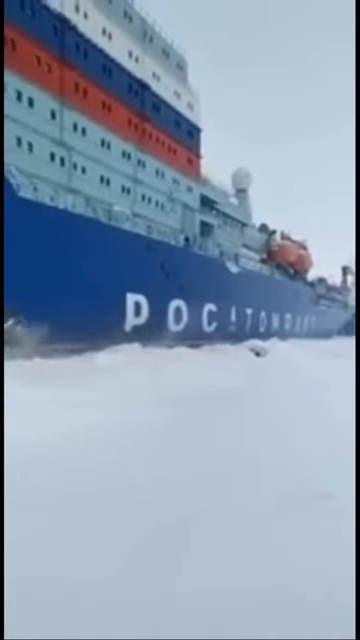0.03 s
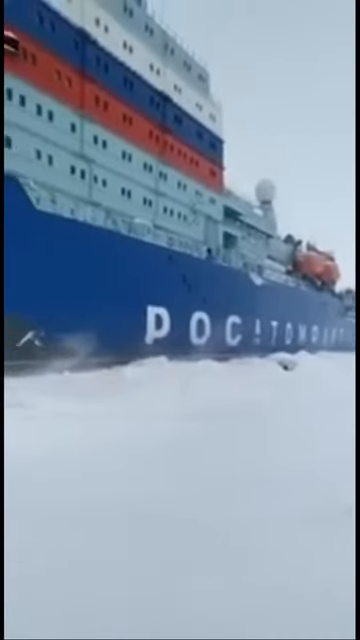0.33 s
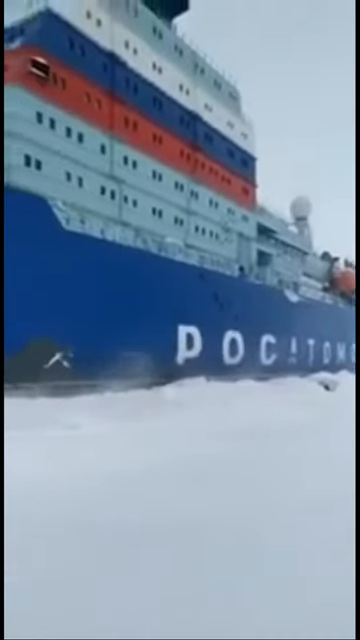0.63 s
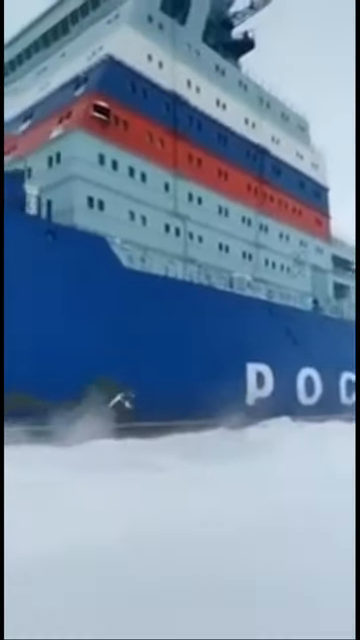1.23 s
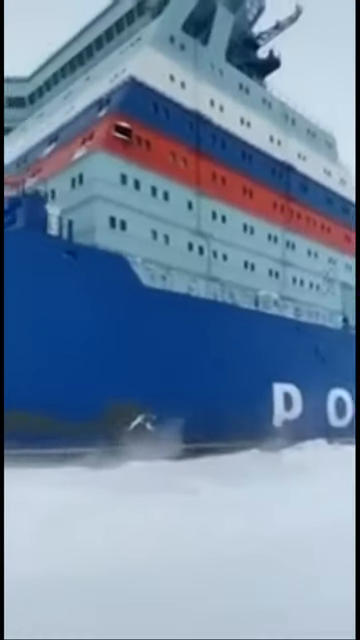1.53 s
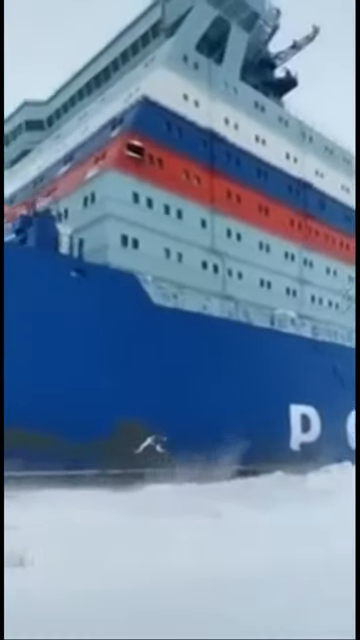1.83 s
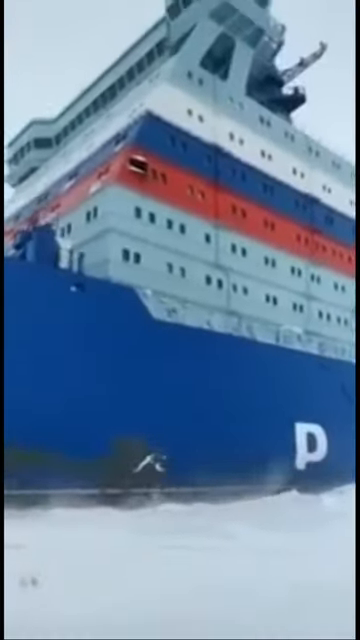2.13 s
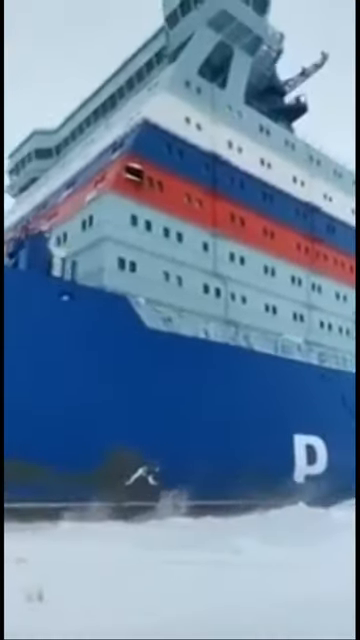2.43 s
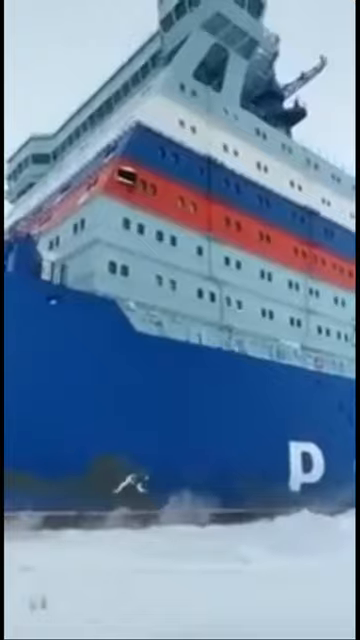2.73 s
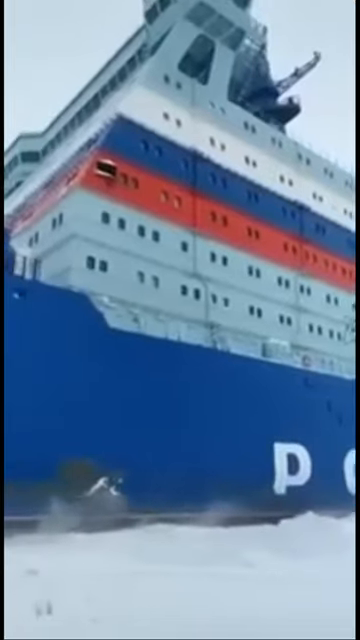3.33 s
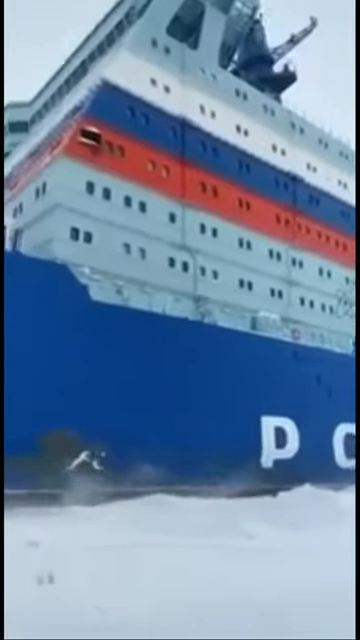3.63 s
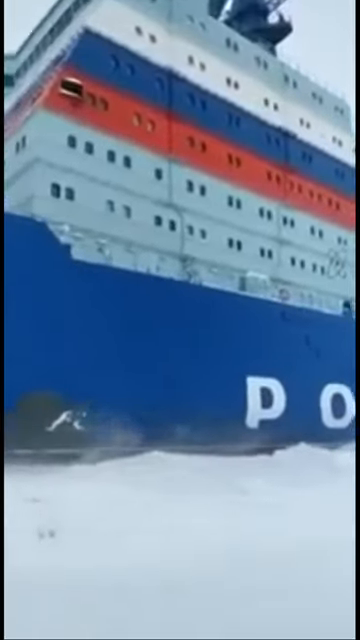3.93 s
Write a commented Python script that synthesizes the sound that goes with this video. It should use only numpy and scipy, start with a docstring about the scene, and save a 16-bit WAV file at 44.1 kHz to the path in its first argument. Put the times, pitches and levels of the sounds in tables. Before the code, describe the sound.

Strong wind buffets the microphone for the whole four seconds, a deep rumble under fluttering air, with short ragged gusts and tiny high ticks. Behind it, ice and snow hiss quietly along a ship's hull, and from about 0.4 seconds the ice gives occasional faint, sharp cracks. The flutter is strongest near 2.7 seconds, followed by a run of hard, rasping gusts until about 3.5 seconds.

```python
"""Strong wind buffets a phone microphone beside a large ship pushing through snow-covered sea ice.
From the start, a deep rumble lies under fluttering air; eddies (swirls of wind) tear across the
microphone's opening and it ticks. Behind the wind, ice and blown snow hiss along the hull, and from
0.4 s the ice cracks now and then. The flutter is strongest near 2.7 s; a run of hard eddies follows."""
import sys
import numpy as np
from scipy import signal
from scipy.fft import rfft, irfft
from scipy.io import wavfile
from scipy.ndimage import uniform_filter1d, map_coordinates

SR = 44100
rng = np.random.default_rng(int(sys.argv[2]) if len(sys.argv) > 2 else 0)


def transcribe(u):
    """Save the signal u as a 16-bit wav file named by the first command-line argument.

    u: samples, shape (n,) or (channels, n), limited to [-1, 1]; the rate is SR.
    q: integer samples, one column per channel.
    """
    v = np.clip(np.atleast_2d(u).T, -1, 1)
    q = np.round(v * 32767).astype(np.int16)
    wavfile.write(sys.argv[1], SR, q)


N = 176400  # 4 seconds

# How loud the ice and snow hiss (time [s], level [dB])
HISS_LEVEL = [(0, -66.5), (0.35, -66.0), (0.46, -61.5), (0.6, -63.5), (0.67, -57.5), (0.77, -62.5),
              (0.93, -60.5), (1.09, -60.5), (1.25, -65.0), (1.45, -64.0), (1.57, -61.5), (1.62, -68.5),
              (1.75, -60.0), (1.95, -64.0), (2.2, -65.0), (2.29, -57.5), (2.37, -64.0), (2.55, -64.0),
              (2.64, -58.5), (2.72, -57.0), (2.75, -65.5), (2.93, -60.0), (3.02, -67.5), (3.14, -66.0),
              (3.25, -62.0), (3.43, -66.0), (3.48, -57.5), (3.65, -62.0), (4.0, -62.5)]
# The tone of the hiss (frequency [Hz], level [dB])
HISS_SPECTRUM = [(800, 0), (2500, 7), (4000, 2.5), (5000, 2.5), (6000, 1.5), (8000, 2.5), (9700, -2.5)]
# Sharp cracks of the ice (time [s], level [dB])
ICE_CRACKS = [(0.4, -41.5), (1.002, -43), (1.735, -38), (2.4, -42), (2.716, -44), (2.976, -46),
              (3.454, -40), (3.702, -45)]
# The clear ticks of the buffeted microphone (time [s], level [dB])
CLEAR_TICKS = [(0.1472, -41), (0.2075, -35), (0.2555, -43), (0.475, -41), (0.5208, -39), (0.5632, -40),
               (0.8181, -40), (0.9757, -39), (1.288, -39), (1.4821, -38), (1.5978, -38), (1.717, -41),
               (1.8423, -36), (1.97, -36), (2.0583, -37), (2.1002, -40), (2.8111, -41), (2.9747, -39),
               (3.0959, -42), (3.1707, -41), (3.271, -38), (3.3942, -42), (3.9185, -39)]
# How loud the deep rumble is (time [s], level [dB])
RUMBLE_LEVEL = [(0, -16.0), (0.22, -18.5), (0.32, -12.5), (0.38, -15.5), (0.66, -17), (0.74, -13),
                (0.82, -16), (1.3, -16.5), (1.34, -12), (1.43, -12), (1.5, -16.0), (1.6, -13.0),
                (1.8, -15.5), (2.02, -19.0), (2.12, -14.5), (2.22, -18.0), (2.44, -13.0), (2.52, -17.0),
                (2.9, -16.5), (3.05, -15.0), (3.7, -17.0), (3.82, -15.0)]
# The tone of the rumble (frequency [Hz], level [dB])
RUMBLE_SPECTRUM = [(12, -10.5), (28, -0.5), (65, -3.5), (115, -6), (200, -12), (320, -19), (600, -43.5),
                   (1500, -89.5)]
# How strongly air flutters over the microphone's opening (time [s], level [dB])
FLUTTER_LEVEL = [(0, -22.5), (0.2, -25), (0.46, -27.5), (0.54, -23.5), (0.61, -28), (0.88, -27),
                 (0.97, -22.5), (1.035, -29.5), (1.05, -23), (1.24, -23.5), (1.3, -30.5), (1.35, -27),
                 (1.372, -19), (1.42, -25), (1.54, -29), (1.71, -23), (1.97, -26), (2.02, -32),
                 (2.06, -18.5), (2.12, -31.5), (2.165, -17.5), (2.21, -33), (2.29, -22.5), (2.45, -23.5),
                 (2.53, -27), (2.675, -23), (2.69, -15), (2.732, -19.5), (2.75, -29), (2.795, -22),
                 (2.87, -26), (3.28, -23.5), (3.4, -26), (3.76, -27), (3.94, -23.5)]
# The tone of the flutter (frequency [Hz], level [dB])
FLUTTER_SPECTRUM = [(60, -12.5), (150, 0), (280, .5), (480, -3), (750, -11), (1200, -21), (2000, -33.5),
                    (3200, -45.5), (8000, -68)]
# How far the flutter's treble, its high part, is turned up or down (time [s], gain [dB])
FLUTTER_TREBLE = [(.35, -1.5), (1.15, 3), (1.8, 1), (2.1, -6), (2.45, 0), (2.7, -3.5), (3.05, -0.5),
                  (3.6, 1)]
# The strongest eddies (peak time [s], swell time [s], level [dB], treble gain [dB])
LARGE_EDDIES = [(.051, .016, -31, -9), (.16, .012, -29, -12), (.221, .016, -31, -10), (.314, .016, -25, -8),
                (.441, .007, -30, -9), (.473, .009, -32, -7), (.541, .016, -32, -3), (.721, .006, -27, -11),
                (.764, .007, -30, -9), (.98, .018, -31, -4), (1.05, .007, -27, -5), (1.071, .012, -33, 2),
                (1.1, .012, -31, -4), (1.133, .006, -27, -9), (1.148, .014, -31, -7),
                (1.162, .012, -28, -11), (1.199, .007, -27, -11), (1.23, .006, -30, -4),
                (1.273, .013, -29, -4), (1.356, .018, -32, -6), (1.385, .02, -28, -1),
                (1.406, .008, -32, -6), (1.425, .006, -31, 3), (1.706, .02, -31, -2),
                (1.802, .014, -30, -1), (1.921, .014, -31, -6), (1.965, .022, -32, -4),
                (2.06, .008, -30, -7), (2.164, .016, -31, -5), (2.409, .02, -30, -5), (2.461, .014, -33, 0),
                (2.579, .016, -31, -11), (2.699, .022, -31, 2), (2.735, .008, -30, -4),
                (2.817, .02, -33, -6), (2.912, .005, -27, -1), (2.927, .012, -24, -2),
                (2.977, .006, -26, 3), (3.074, .014, -31, 2), (3.134, .008, -25.5, 0),
                (3.182, .014, -27, 0), (3.236, .006, -25, -11), (3.272, .004, -26, -1),
                (3.325, .004, -32, 4), (3.396, .008, -29, -6), (3.434, .016, -32, -6),
                (3.456, .004, -28, 3), (3.477, .007, -29, -4), (3.498, .007, -25, -10),
                (3.769, .007, -30, -3), (3.939, .011, -30, -3)]
# The tone of an eddy before its treble gain (frequency [Hz], level [dB])
EDDY_SPECTRUM = [(100, -8), (350, 4.5), (700, 2), (1100, -2.5), (2000, -14), (3200, -24.5), (5000, -33.5),
                 (9500, -48)]

# Boosts added to each sound's levels
HISS_BOOST_DB, TICK_BOOST_DB, RUMBLE_BOOST_DB, FLUTTER_BOOST_DB, EDDY_BOOST_DB = 8, 1.2, 2, 3.5, 7.3


def undb(db):
    """Turn decibels into a number to multiply by."""
    return 10 ** (np.asarray(db) / 20)


def curve(rows):
    """Join (time, value) rows by straight lines."""
    return np.interp(np.arange(N) / SR, *np.array(rows).T)


def noise(spectrum):
    """Noise with the given tone and an average power of 1."""
    hz, db = np.array(spectrum).T
    bins = np.maximum(np.arange(N // 2 + 1) * SR / N, 1)
    gain = undb(np.interp(np.log(bins), np.log(hz), db)) * (bins < SR / 4)
    x = irfft(rfft(rng.standard_normal(N)) * gain, N)
    return x / x.std()


def walk(rate):
    """A smooth random wobble, about 1 in size, that changes about rate times a second."""
    points = rng.standard_normal(4096)
    x = map_coordinates(points, [np.arange(N) / SR * rate], order=3, mode="wrap")
    return x / x.std()


def lowpass(x, hz, order=2):
    """Keep what lies below hz, without delaying it."""
    return signal.sosfiltfilt(signal.butter(order, min(hz, SR / 3), fs=SR, output="sos"), x)


def flicker(x, db):
    """Move the level by db while the average power stays the same."""
    gain = undb(db)
    return x * gain / np.sqrt(np.mean(gain ** 2))


def even(x, seconds):
    """Hold a noise's power near 1 over the given time, keeping its faster flicker."""
    size = int(seconds * SR)
    return x / np.sqrt(uniform_filter1d(uniform_filter1d(x ** 2, size), size))


def ice_and_snow():
    """Ice and blown snow hiss along the hull; each crack starts at once and dies away fast."""
    t, crack_decay_s = np.arange(N) / SR, .004
    hiss = flicker(noise(HISS_SPECTRUM), db=1.94 * walk(rate=130))
    hiss *= undb(curve(HISS_LEVEL) + HISS_BOOST_DB)
    crack_gain = np.zeros(N)
    for start, db in ICE_CRACKS:
        crack_gain += undb(db) * (t >= start) * np.exp(-np.abs(t - start) / crack_decay_s)
    return hiss + crack_gain * noise(HISS_SPECTRUM)


def microphone_ticks():
    """The buffeted microphone gives very short, high pings: a few clear, many faint."""
    t, out = np.arange(N) / SR, np.zeros(N)
    width_s, delay_s = .00042, .0014
    faint_times = rng.uniform(0, N / SR, size=130)
    faint_db = -46.5 + 2 * rng.standard_normal(size=130)
    for time, db in list(CLEAR_TICKS) + list(zip(faint_times, faint_db)):
        sample = int(time * SR)
        near = slice(max(sample - SR // 100, 0), sample + SR // 100)
        from_peak = t[near] - time - delay_s
        pitch_hz = 5940 * (1 + 0.025 * rng.standard_normal())
        shape = np.exp(-(from_peak / width_s) ** 2)
        out[near] += undb(db + TICK_BOOST_DB) * shape * np.sin(2 * np.pi * pitch_hz * from_peak)
    return out


def wind_rumble():
    """Slow swings in the wind's pressure make a deep rumble."""
    return noise(RUMBLE_SPECTRUM) * undb(curve(RUMBLE_LEVEL) + RUMBLE_BOOST_DB)


def wind_flutter():
    """Small eddies shake the airflow; the higher sounds flicker most."""
    air = noise(FLUTTER_SPECTRUM)
    shake_db = 5 * np.sqrt(2) * np.tanh(walk(rate=200))
    low = lowpass(air, hz=537)
    air = flicker(low, 0.86 * shake_db) + flicker(air - low, shake_db)
    air = even(air, seconds=.03)
    body = lowpass(air, hz=1210)
    treble = undb(curve(FLUTTER_TREBLE)) * (air - body)
    return (body + treble) * undb(curve(FLUTTER_LEVEL) + FLUTTER_BOOST_DB)


def wind_eddies():
    """Each large eddy hits the microphone as a short, ragged burst; those with strong treble rasp."""
    t, out = np.arange(N) / SR, np.zeros(N)
    air = flicker(noise(EDDY_SPECTRUM), db=2.2 * walk(rate=450))
    air = even(air, seconds=.008)
    body = lowpass(air, hz=1850)
    for peak_s, swell_s, db, treble_db in LARGE_EDDIES:
        width_s = np.where(t < peak_s, swell_s, .6 * swell_s)  # breaks off faster than it swells
        shape = np.exp(-2 * ((t - peak_s) / width_s) ** 2)
        burst = body + undb(treble_db) * (air - body)
        out += undb(db + EDDY_BOOST_DB) * shape * burst
    return out


def microphone_overload(wind):
    """The microphone gives way under strong pressure, rounding off the wind's biggest swings."""
    pressure_limit = 0.68
    rounded = pressure_limit * np.tanh(wind / pressure_limit)
    return wind + lowpass(rounded - wind, hz=3600)  # add only the lower part of the distortion


def scene():
    """Loud wind over quiet ice and ticks, in one channel."""
    wind = microphone_overload(wind_rumble() + wind_flutter() + wind_eddies())
    return (wind + ice_and_snow() + microphone_ticks())[None]


def record(dry):
    """The sound fades quickly in and out, and the phone cuts away the highest treble."""
    t, fade_s, cutoff_hz = np.arange(N) / SR, .003, 9700
    fade = np.clip(np.minimum(t, t[-1] - t) / fade_s, 0, 1)
    treble_cut = signal.ellip(12, .2, 80, cutoff_hz, fs=SR, output="sos")
    return signal.sosfilt(treble_cut, dry * fade)


dry = scene()
out = record(dry)
transcribe(out)
```